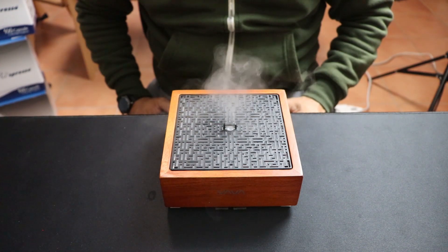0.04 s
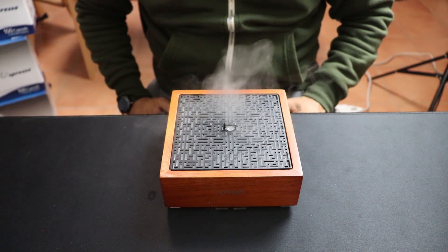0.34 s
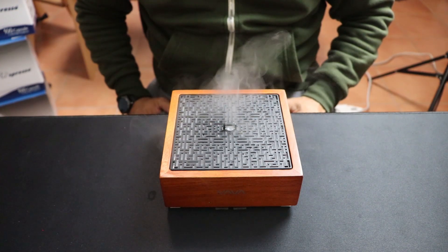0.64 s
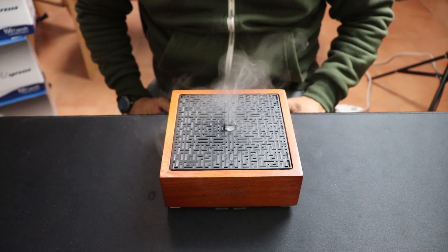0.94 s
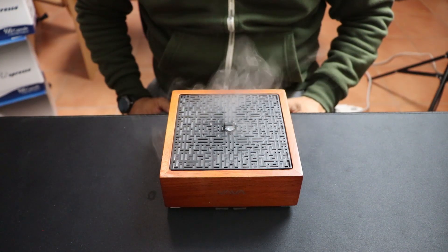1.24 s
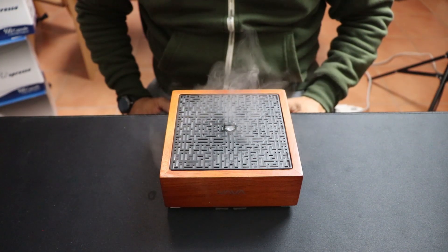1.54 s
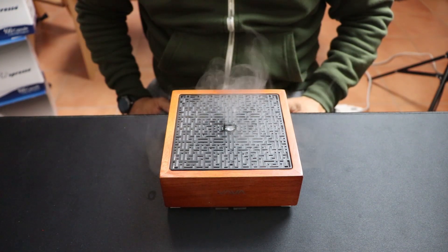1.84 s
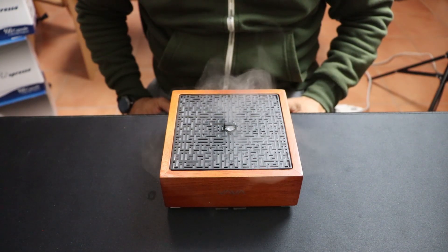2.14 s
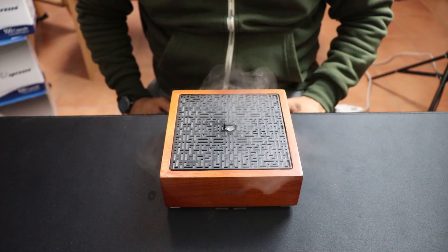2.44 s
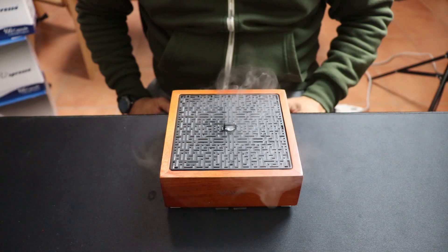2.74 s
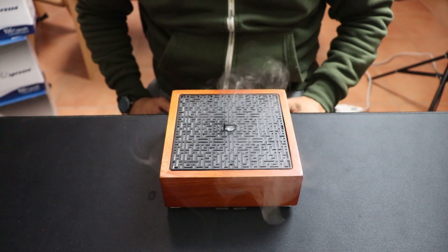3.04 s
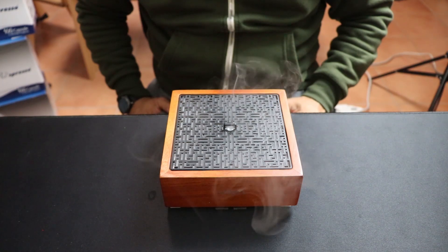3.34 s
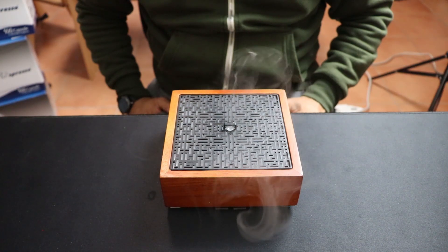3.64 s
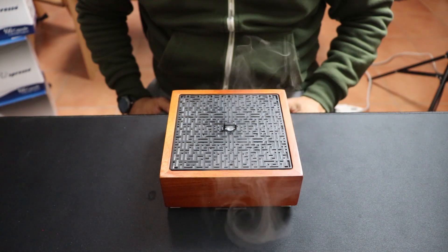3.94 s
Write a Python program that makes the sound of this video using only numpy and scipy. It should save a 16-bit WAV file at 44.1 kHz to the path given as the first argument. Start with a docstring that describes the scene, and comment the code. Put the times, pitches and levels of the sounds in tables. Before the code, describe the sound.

A mist diffuser's small fan hums steadily with softly rushing air in a quiet room.

```python
"""Mist diffuser in a quiet room

A small fan hums close by and slowly gathers speed, while its motor buzzes faintly in the case.
Air rushes through the lid and a few droplets tick. Under it lie a throbbing low rumble,
steady tones from mains power and appliances, two low hums that come and go, and an even hiss."""
import sys
import numpy as np
from scipy import signal
from scipy.fft import rfft, irfft
from scipy.io import wavfile

SR = 44100
rng = np.random.default_rng(int(sys.argv[2]) if len(sys.argv) > 2 else 0)


def materialize(psi):
    """Save the field psi as 16-bit PCM at rate SR to the path in sys.argv[1].

    A 1-D psi becomes a single channel; in a 2-D psi each row is a channel.
    """
    bounded = np.clip(np.atleast_2d(psi).T, -1, 1)
    quanta = np.round(bounded * 32767).astype(np.int16)
    wavfile.write(sys.argv[1], SR, quanta)


N = 176400
TIME, FREQS = np.arange(N) / SR, np.arange(N // 2 + 1) * SR / N


# How fast the fan turns: t/s, f/Hz (turns per second)
FAN_SPEED = [(0, 65.85), (.5, 65.92), (1, 66.09), (1.8, 66.45), (3, 66.68), (3.6, 66.81), (4, 66.8)]

def fan_speed():
    """The fan speeds up a little, never quite evenly."""
    return curve(FAN_SPEED) * (1 + .00035 * drift(1.7))


# The fan's tones: multiple of the speed, level/dB at average speed, dB gained per extra turn a second
FAN_TONES = [(4, -66, -1), (5, -63.5, -2), (7, -55.5, 4.5), (8, -55.5, -5.5), (9, -63.5, -3),
             (16, -75, 3.5), (24, -78.5, -3), (26, -81, -7)]

def fan_hum(turns, speed):
    """The fan hums at multiples of its speed; their balance shifts as it speeds up."""
    extra_speed = speed - speed.mean()
    return sum(gain(db + slope * extra_speed) * tone(round(multiple) * turns, waver_db=.45)
               for multiple, db, slope in FAN_TONES)


# Pitches at which the case likes to ring: f/Hz, width/Hz, relative level/dB
CASE_RINGS = [(2170, 190, -5.5), (2654, 70, -1), (2924, 190, 0), (3453, 140, -6.5), (3704, 84, -11),
              (4040, 64, -3), (4410, 120, -10)]

def motor_buzz(turns):
    """The motor buzzes at high multiples of its speed, loudest where the case rings along."""
    multiples = np.arange(28, 72)
    pitches = multiples * turns[-1] / TIME[-1]
    strengths = sum(gain(db) * resonance(pitches, hz, width) ** 2 for hz, width, db in CASE_RINGS)
    buzz = sum(strength * tone(multiple * turns, waver_db=2, waver_hz=3.2)
               for multiple, strength in zip(multiples, strengths))
    return set_level(buzz, db=-70)


# The rush of air, from low to high: f/Hz, relative level/dB
AIR_SHAPE = [(100, -5), (150, -9.5), (230, -7), (290, -4.5), (345, 2), (380, 0), (400, -6.5), (440, -3),
             (510, -2.5), (560, -9), (650, -7.5), (720, -12), (1040, -14.5), (1110, -10.5), (1175, -9),
             (1240, -13.5), (1520, -17.5), (1640, -14.5), (1810, -15.5), (1920, -22.5), (2250, -24),
             (2500, -26.5), (3100, -30), (4200, -30.5), (6000, -36), (12000, -55)]

def air_rush():
    """Air rushes through the lid with a slight flutter."""
    flutter_db = .24 * drift(28)
    return set_level(noise(AIR_SHAPE) * gain(flutter_db), db=-49.5)


# One row for each droplet: t/s, starting level/dB, f/Hz
DROPLETS = [(.046, -57, 5200), (.4015, -57, 4900), (.535, -62, 5200), (.586, -60, 5200), (1.035, -65, 9500),
            (1.043, -60, 10800), (1.065, -66, 11500), (1.54, -64, 5100)]

def droplets(fade_s=.0025):
    """Each droplet is a tiny, bright tick of noise that dies at once."""
    ticks = np.zeros(N)
    for start, db, hz in DROPLETS:
        fade = (TIME >= start) * np.exp(-np.abs(TIME - start) / fade_s)
        ticks += gain(db) * noise_band(hz, width_hz=.22 * hz) * fade
    return ticks


# How the rumble throbs: t/s, level/dB before the boost
RUMBLE_LEVELS = [(0.0, -45), (0.08, -45), (0.4, -42), (0.44, -52.5), (0.78, -39.5), (0.86, -48),
                 (0.96, -39), (1.26, -43), (1.35, -58), (1.4, -43), (1.46, -56), (1.56, -38.5), (1.68, -38),
                 (1.77, -55), (1.84, -39.5), (2.15, -57.5), (2.23, -41), (2.39, -39.5), (2.76, -52),
                 (2.91, -40), (3.31, -45), (3.42, -66), (3.59, -40), (3.72, -46), (3.92, -37), (4.0, -45)]

def room_rumble(boost_db=.5):
    """A very low tone throbs while its pitch wanders."""
    pitch_hz = 32.17 + .98 * drift(2.35)
    return tone(np.cumsum(pitch_hz) / SR) * gain(curve(RUMBLE_LEVELS) + boost_db)


# How the upper and the deeper hum rise and fall: t/s, level/dB before the trim
UPPER_HUM_LEVELS = [(0.0, -53.5), (0.15, -66.5), (0.77, -53), (1.01, -80), (1.18, -57.5), (1.5, -54.5),
                    (1.8, -66.5), (2.13, -56), (2.62, -64), (2.66, -82), (2.82, -58.5), (3.68, -70.5),
                    (3.78, -58.5), (4.0, -59.5)]
DEEP_HUM_LEVELS = [(0.0, -59.5), (1.54, -53.5), (1.88, -68), (1.9, -58.5), (2.43, -51.5), (3.09, -54.5),
                   (3.13, -65), (3.19, -54.5), (3.83, -55.5), (4.0, -66)]

def low_hums(upper_hz=199.4, deep_hz=72, upper_trim_db=-.5, deep_trim_db=-1):
    """Two low hums fade in and out, each at a steady pitch."""
    upper = tone(upper_hz * TIME) * gain(curve(UPPER_HUM_LEVELS) + upper_trim_db)
    deep = tone(deep_hz * TIME) * gain(curve(DEEP_HUM_LEVELS) + deep_trim_db)
    return upper + deep


# The room's dull noise: f/Hz, relative level/dB
ROOM_SHAPE = [(12, -25), (18, -15), (26, -7.5), (34, 0.5), (42, -10), (51, 5.5), (57, 5), (64, -2.5),
              (70, -0.5), (77, 3.5), (86, -7.5), (110, -13.5), (150, -35.5), (300, -43)]

def room_noise(swell_s=3.24, width_s=.059):
    """Dull noise fills the room, with one brief low swell."""
    rise_and_fall = np.exp(-.5 * ((TIME - swell_s) / width_s) ** 2)
    swell = gain(-50) * noise_band(126.7, width_hz=10.6) * rise_and_fall
    return swell + set_level(noise(ROOM_SHAPE), db=-58)


# Electrical tones in the room: f/Hz, level/dB, waver/dB
APPLIANCE_TONES = [(172.3, -70, -0.5), (251.8, -82, 2), (300, -69.5, 3)]

def appliances():
    """Mains power and appliances hold their pitch while their loudness wavers."""
    return sum(gain(db) * tone(hz * TIME, waver_db) for hz, db, waver_db in APPLIANCE_TONES)


# Hiss in the middle and at the sides: f/Hz, relative level/dB
MIDDLE_HISS = [(500, -10.5), (4000, -2.5), (8000, 3.5), (15500, 2.4), (20000, 0)]
SIDE_HISS = [(30, -19), (180, 4.5), (400, -9.5), (1500, -21), (2500, -12), (4000, -1.5), (15000, -3)]

def hiss():
    """An even hiss; one part is added on the left and taken away on the right, so it sounds wide."""
    middle = set_level(noise(MIDDLE_HISS), db=-68.5)
    sides = set_level(noise(SIDE_HISS), db=-70.5)
    return middle + sides * np.array([[1], [-1]])


def gain(db):
    """Turn decibels into a number to multiply by."""
    return 10 ** (np.asarray(db) / 20)


def set_level(sound, db):
    """Scale a sound to an average (rms) level."""
    return sound * gain(db) / np.sqrt(np.mean(sound ** 2))


def curve(points):
    """Join (time, value) points with straight lines."""
    return np.interp(TIME, *np.array(points).T)


def shaped_noise(gains):
    """Noise with its own strength at each frequency."""
    return irfft(rfft(rng.standard_normal(N)) * gains, N)


def drift(rate_hz):
    """A smooth random wobble, about one in size."""
    return set_level(shaped_noise(np.exp(-(FREQS / rate_hz) ** 2) * (FREQS > 0)), db=0)


def noise(shape):
    """Noise that follows a table of frequencies and levels."""
    hz, db = np.array(shape).T
    return shaped_noise(gain(np.interp(np.log(FREQS + 1), np.log(np.sort(hz)), db)))


def resonance(hz, centre_hz, width_hz):
    """How strongly something rings: most at its own pitch, less to either side."""
    return 1 / (1 + ((hz - centre_hz) / width_hz) ** 2)


def noise_band(centre_hz, width_hz):
    """Noise gathered around one pitch."""
    return set_level(shaped_noise(resonance(FREQS, centre_hz, width_hz)), db=0)


def tone(cycles, waver_db=0, waver_hz=3):
    """A pure tone whose loudness can waver."""
    wave = np.sin(2 * np.pi * (cycles + rng.random()))
    return set_level(wave * gain(waver_db * drift(waver_hz)), db=0)


def scene():
    """The diffuser and the room sit in the middle, with hiss around them."""
    speed = fan_speed()
    turns = np.cumsum(speed) / SR
    diffuser = fan_hum(turns, speed) + motor_buzz(turns) + air_rush() + droplets()
    return diffuser + room_rumble() + low_hums() + room_noise() + appliances() + hiss()


def record(dry):
    """A steep filter cuts off the highest treble."""
    top_hz = 15600
    return signal.sosfilt(signal.ellip(12, .1, 90, top_hz, fs=SR, output="sos"), dry)


dry = scene()
out = record(dry)
materialize(out)
```